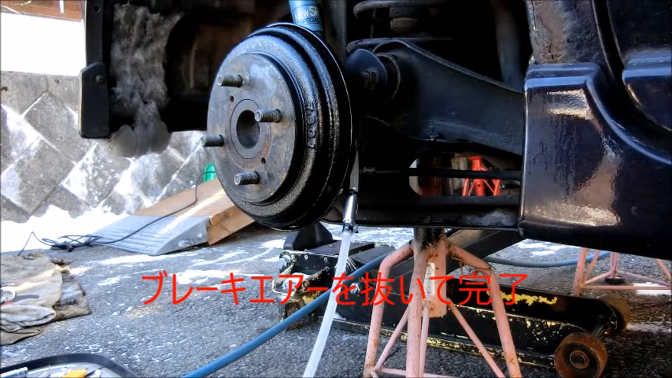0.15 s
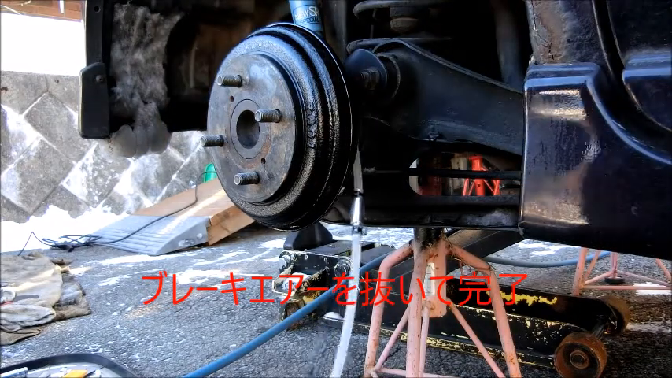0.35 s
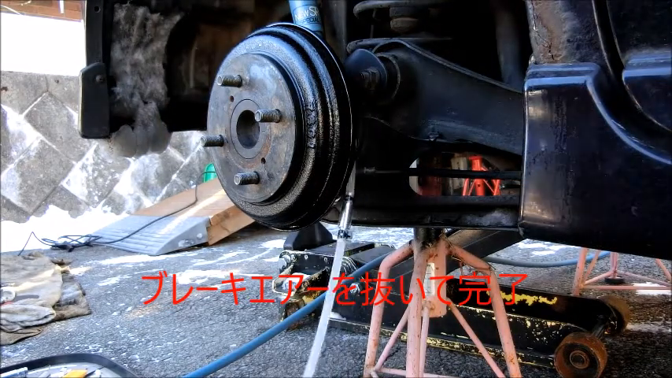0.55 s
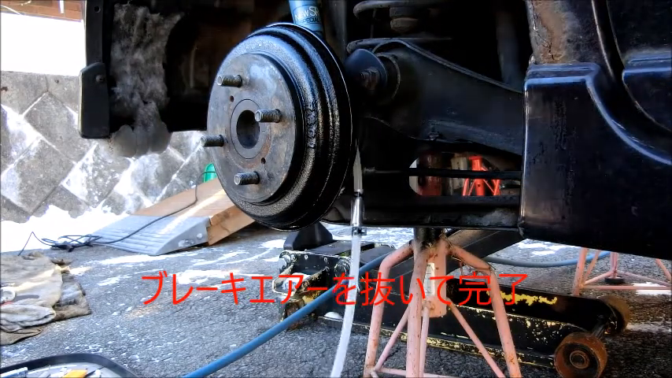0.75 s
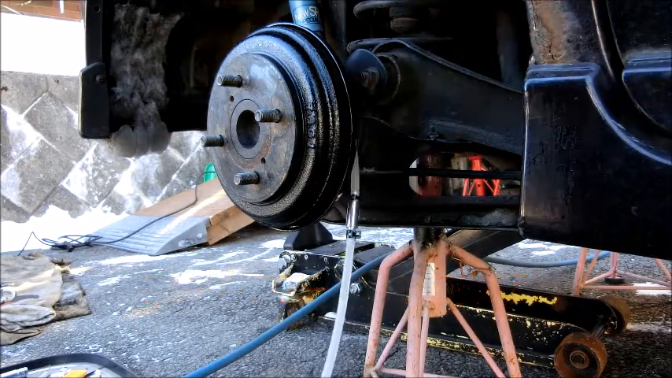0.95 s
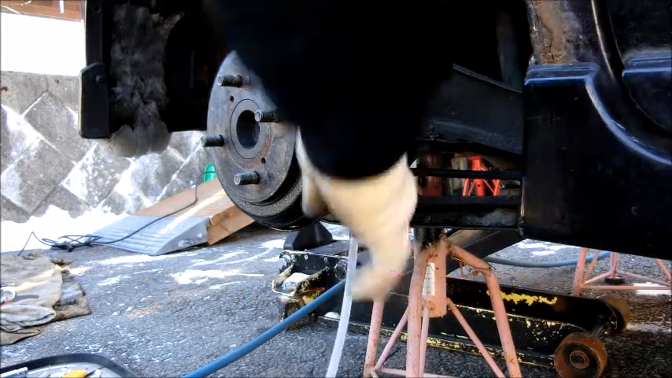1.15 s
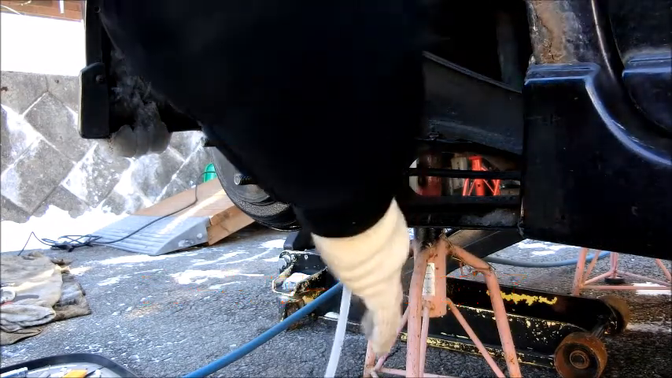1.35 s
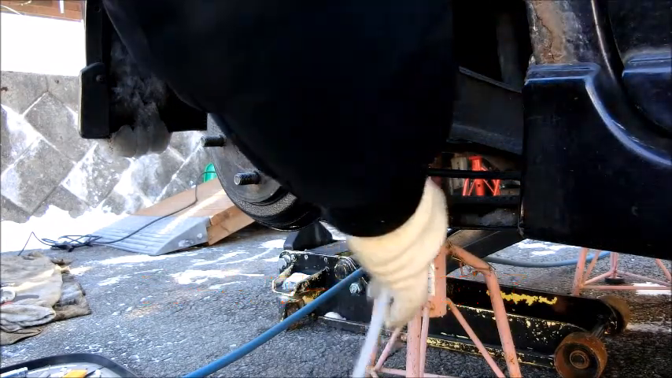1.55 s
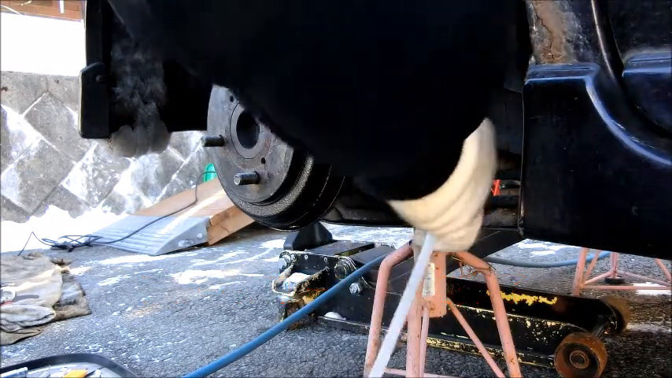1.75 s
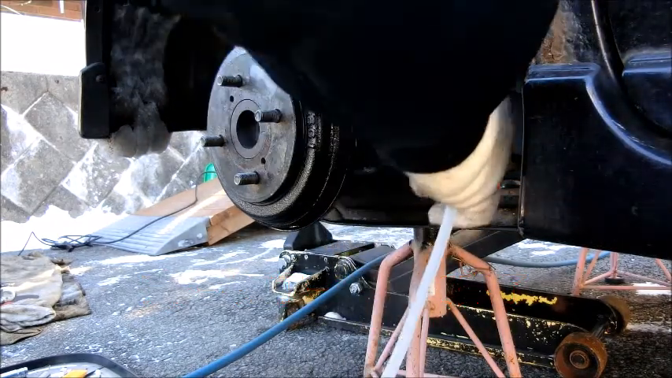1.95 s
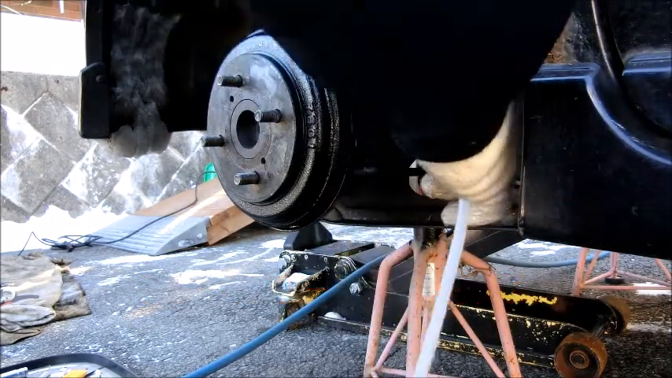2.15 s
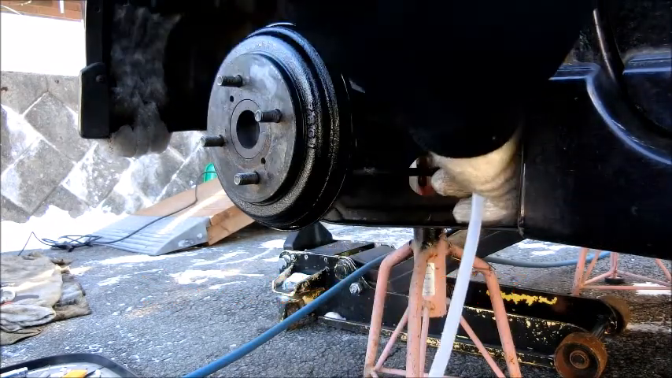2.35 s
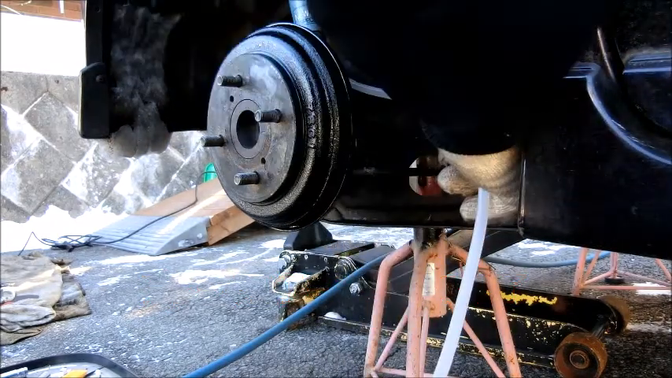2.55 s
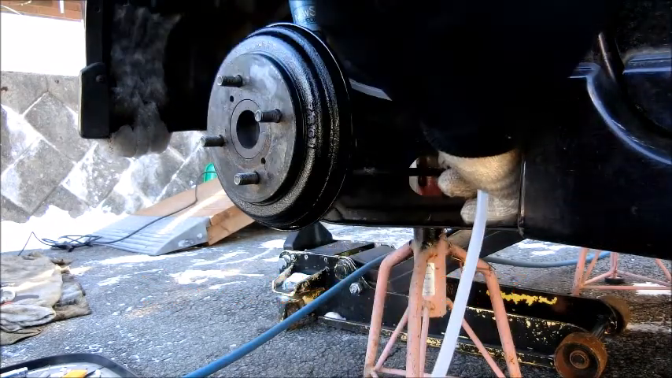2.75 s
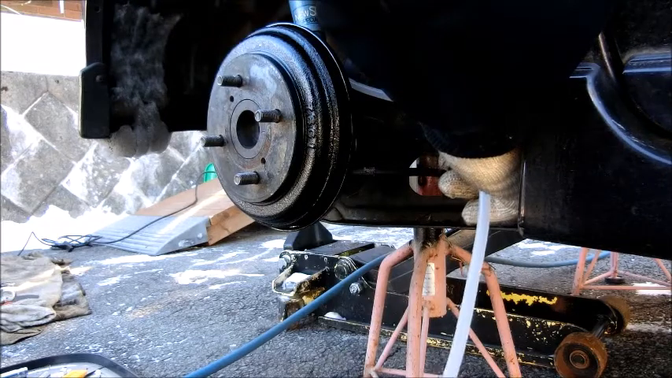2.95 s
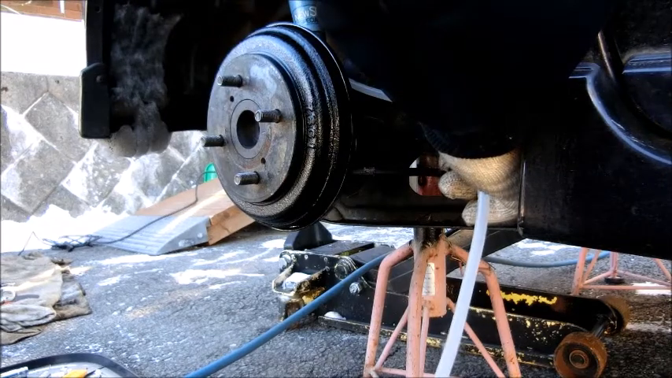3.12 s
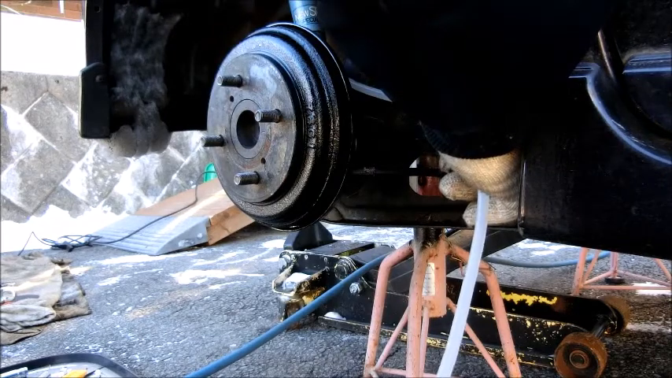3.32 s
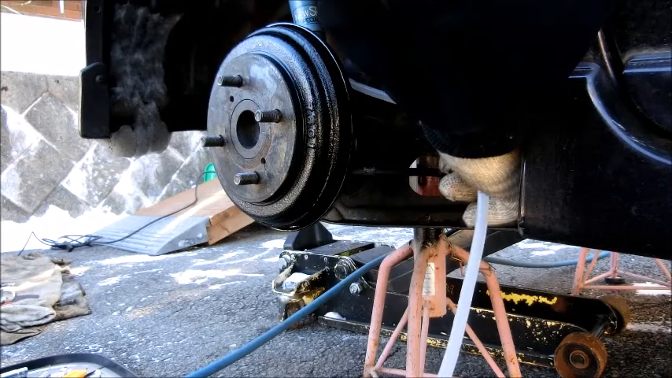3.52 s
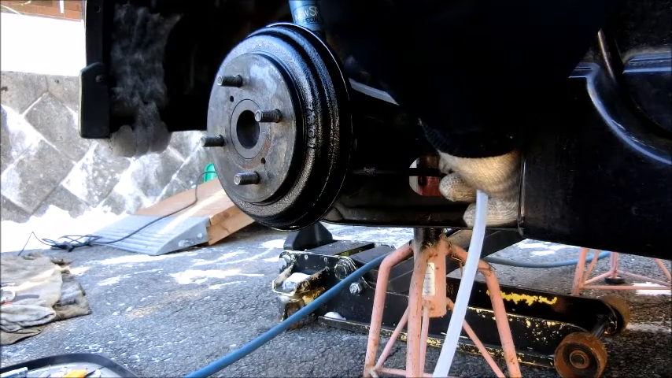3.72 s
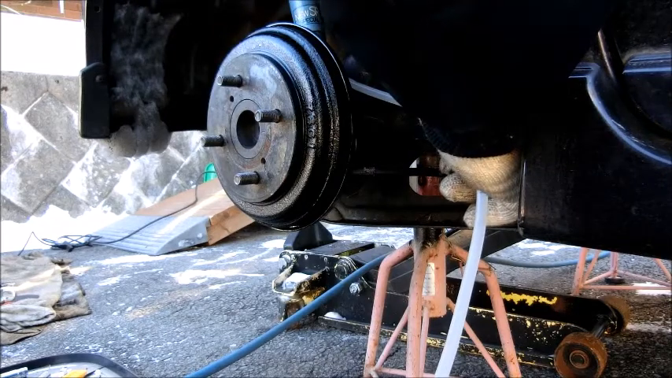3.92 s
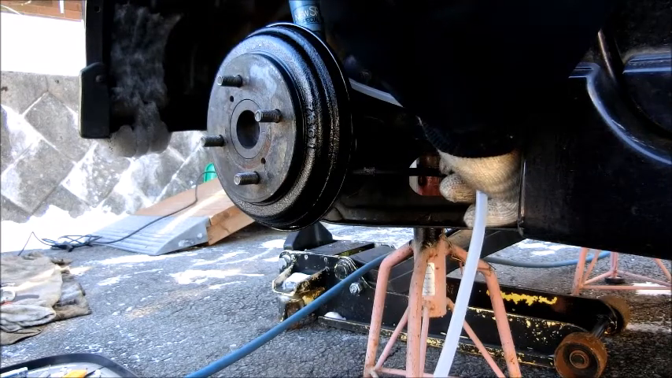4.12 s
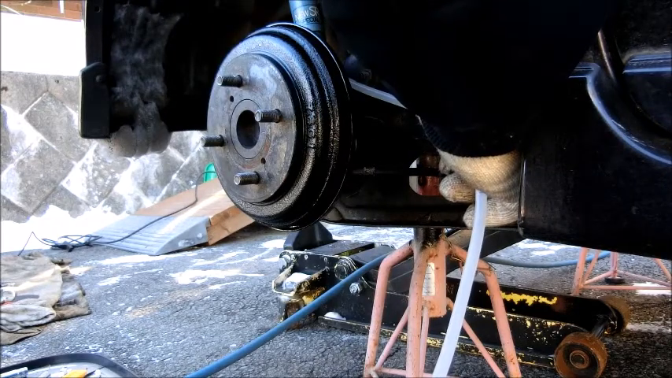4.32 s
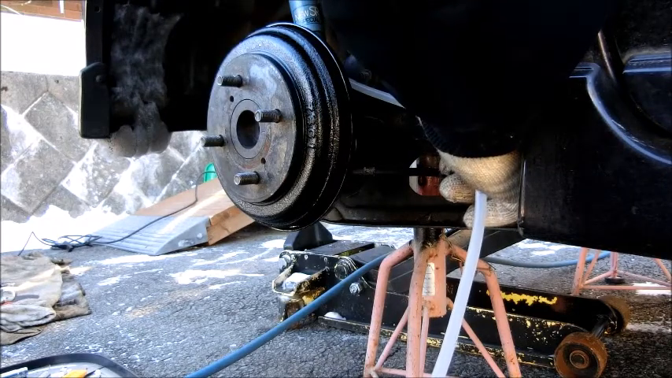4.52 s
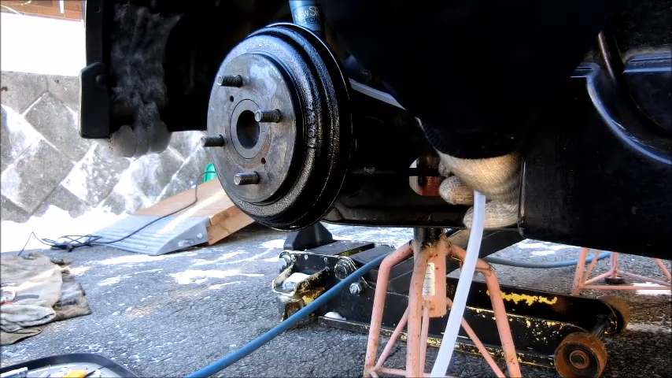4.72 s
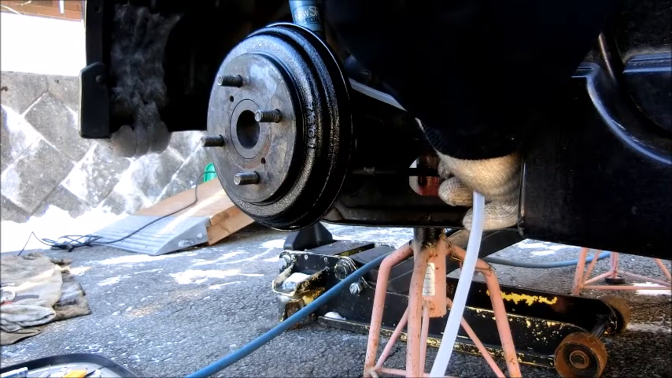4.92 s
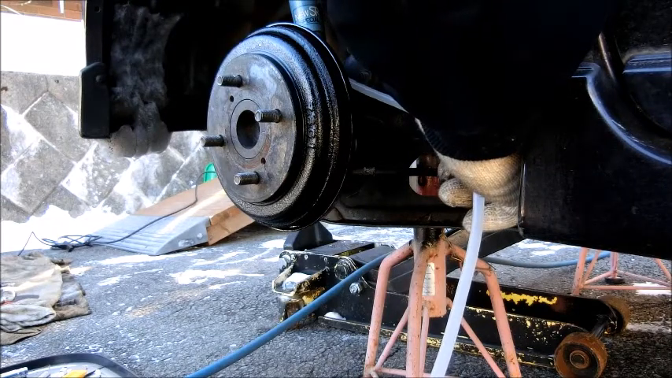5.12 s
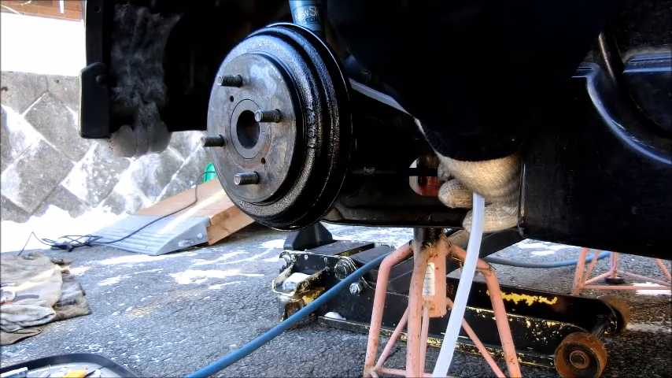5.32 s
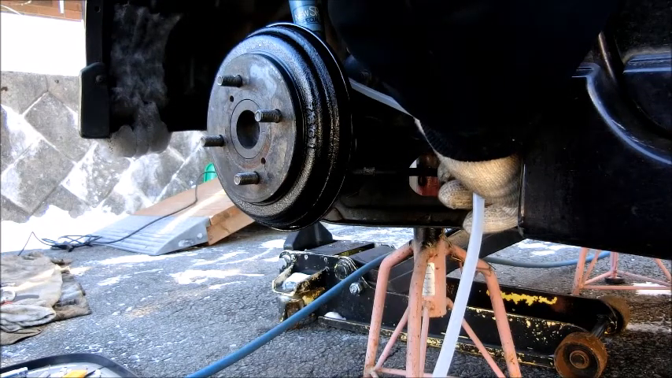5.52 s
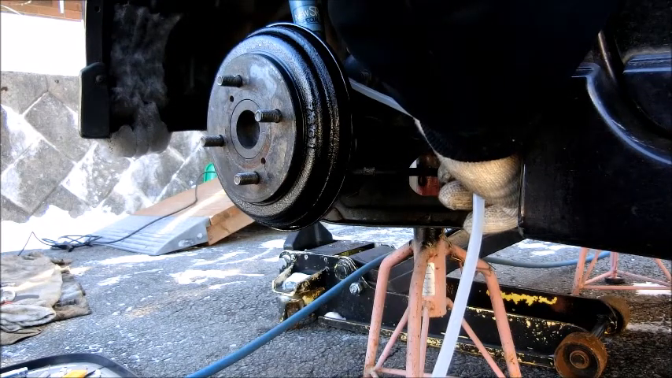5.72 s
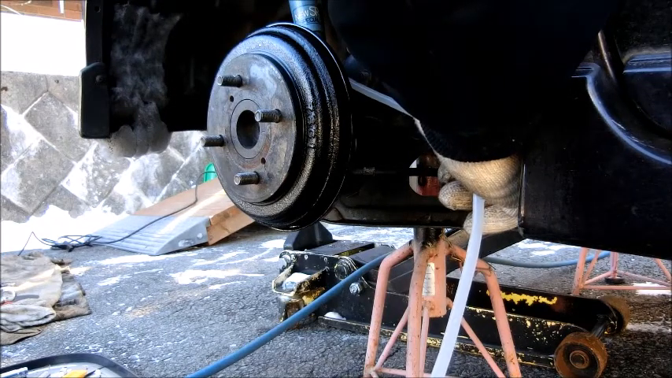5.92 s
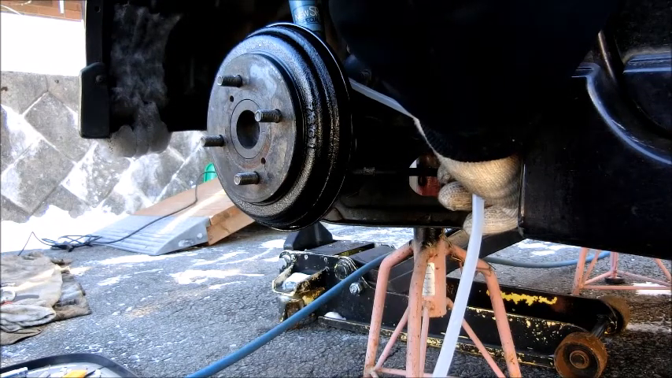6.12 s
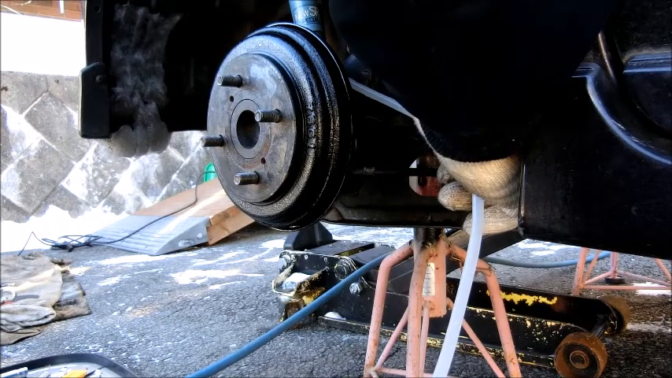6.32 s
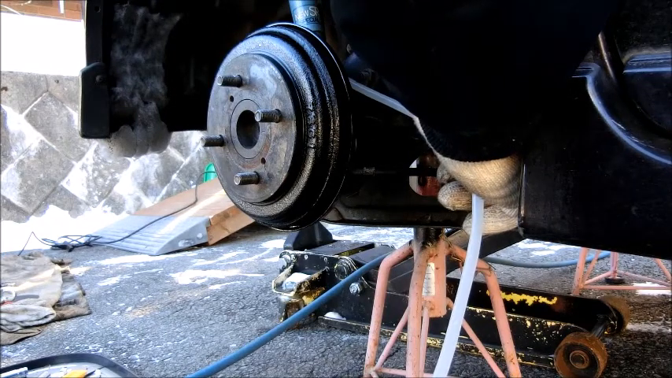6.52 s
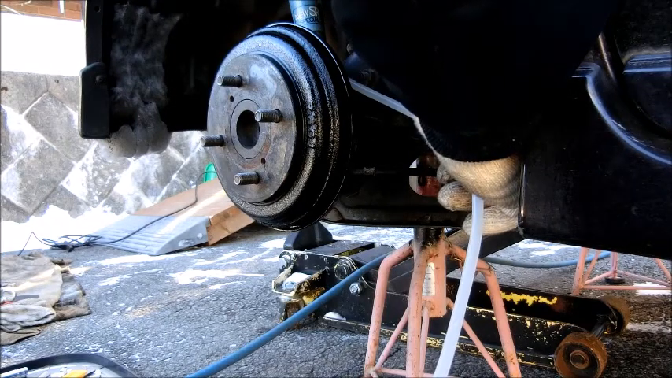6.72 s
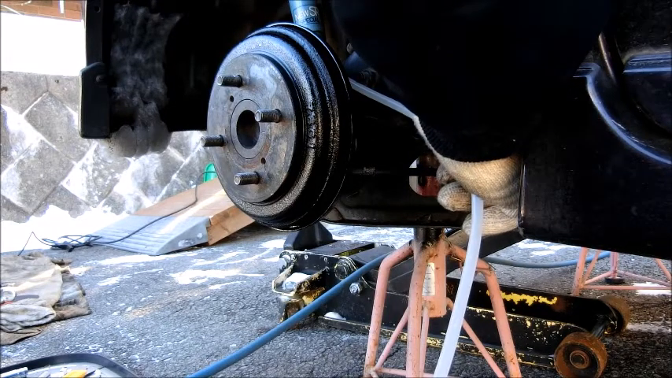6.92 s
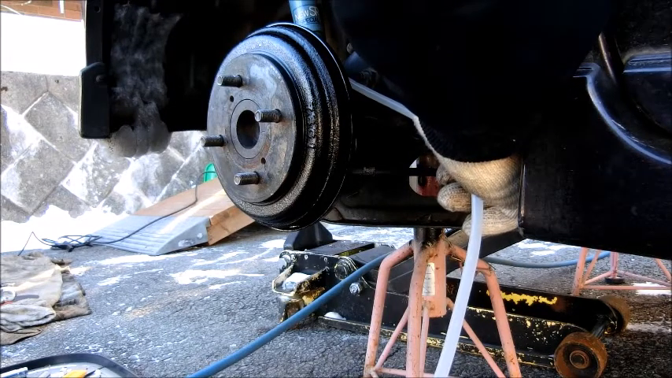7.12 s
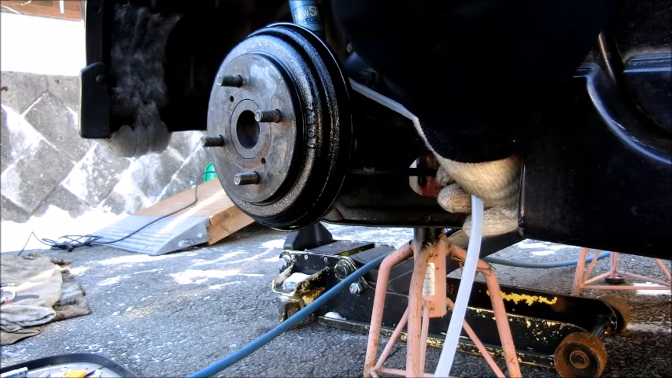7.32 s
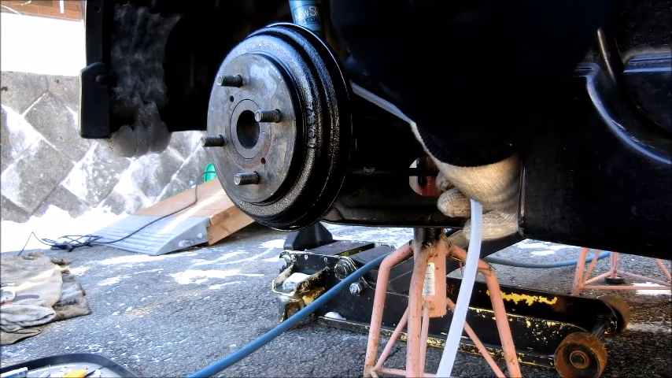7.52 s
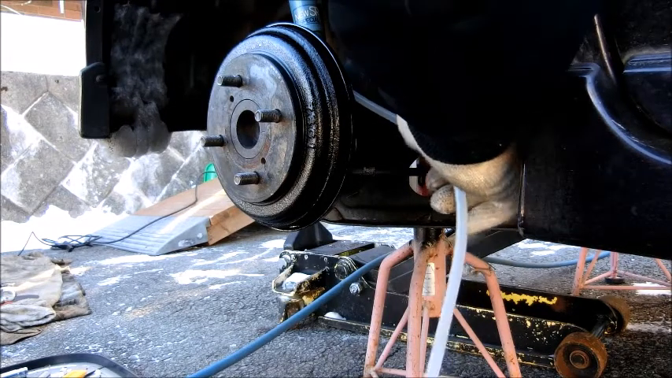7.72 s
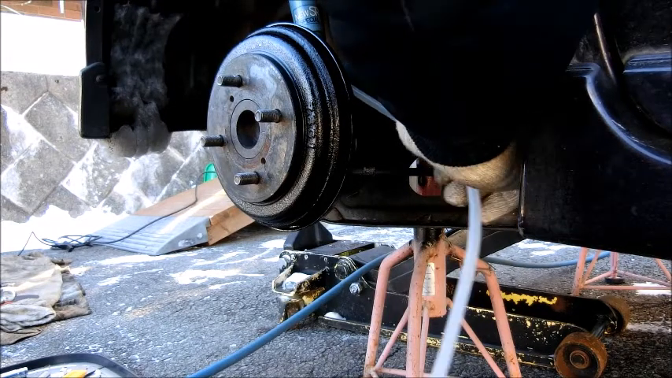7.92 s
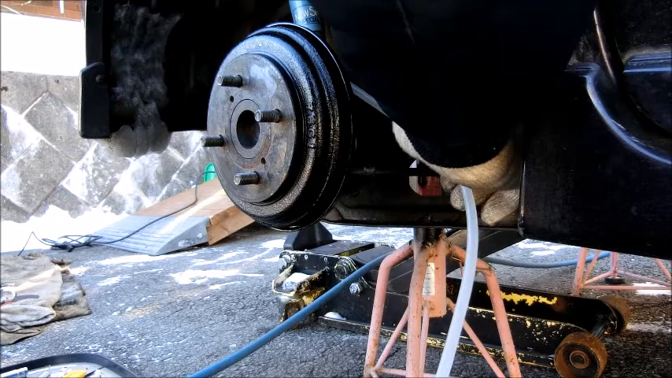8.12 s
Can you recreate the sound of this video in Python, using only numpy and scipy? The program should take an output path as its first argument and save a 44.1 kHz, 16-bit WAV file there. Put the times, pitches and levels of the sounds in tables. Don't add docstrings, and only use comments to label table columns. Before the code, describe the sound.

Over a faint air leak, metal clatters and cloth rubs close by; after low wind puffs, a bright jet of air bursts out and keeps hissing.

```python
import sys
import numpy as np
from scipy import signal
from scipy.fft import rfft, irfft, next_fast_len
from scipy.io import wavfile
from scipy.ndimage import uniform_filter1d

SR = 44100
rng = np.random.default_rng(int(sys.argv[2]) if len(sys.argv) > 2 else 0)


def store_pcm(level_fs):
    pcm = np.round(np.clip(level_fs, -1, 1) * 32767).astype(np.int16)
    wavfile.write(sys.argv[1], SR, np.atleast_2d(pcm).T)


def makeup_ratio(level_db):
    decades = np.asarray(level_db, float) / 20
    return 10 ** decades


N = 359856

# f/Hz, likeness/0-1
NEAR_ALIKE = [(60, 0.62), (300, 0.95), (1400, 0.76), (3100, 0.39), (7000, 0.087), (15000, 0.12)]


def unit(x):
    return x / np.sqrt(np.mean(x ** 2) + 1e-20)


def along(points, hz):
    f, v = np.transpose(points)
    return np.interp(np.log(hz + 1), np.log(f + 1), v)


def curves(rows):
    s, *cols = np.transpose(rows)
    return [np.interp(np.arange(N) / SR, s, c) for c in cols]


def wobble(rate_hz):
    knots = rng.standard_normal(int(N * rate_hz / SR) + 2)
    return np.interp(np.arange(N) * rate_hz / SR, np.arange(len(knots)), knots)


def smooth(shape):
    grid_s = np.arange(0, N / SR + .01, .001)
    return np.interp(np.arange(N) / SR, grid_s, shape(grid_s))


def stroke(t, rise_s, fall_s):
    return makeup_ratio(-10 * np.where(t < 0, -t / rise_s, t / fall_s))


def add(track, s, sound):
    start = round(s * SR)
    track[..., start:start + sound.shape[-1]] += sound


def filtered(x, response):
    m = next_fast_len(N + 8192)
    return irfft(rfft(x, m) * response(np.fft.rfftfreq(m, 1 / SR)), m)[..., :N]


def bumps(hz, rows, column=2):
    return sum(r[column] * np.exp(-((hz - r[0]) / r[1]) ** 2) for r in rows)


def rush(spectrum, alike, patchy_db, aside=0, rough_db=0):
    # f/Hz, lead/rad
    port_lead = [(500, .1), (1400, .3), (4800, 1.5), (7000, 2.7), (8300, 3.1), (9600, 3.9), (11000, 4.8),
                 (13000, 5), (15500, 5.4)]
    z = signal.stft(rng.standard_normal((2, N)), nperseg=512)[2]
    field = uniform_filter1d(rng.standard_normal(z.shape[1:]), size=8, axis=0)
    field = uniform_filter1d(field, size=10, axis=1)
    pair = signal.istft(z * makeup_ratio(patchy_db * unit(field)), nperseg=512)[1][:, :N]
    pair = pair * makeup_ratio(rough_db * wobble(700))
    m = next_fast_len(N)
    hz = np.fft.rfftfreq(m, 1 / SR)
    turn = np.arccos(np.clip(along(alike, hz), -1, 1)) / 2
    mid, side = rfft(pair, m) * makeup_ratio(along(spectrum, hz)) * [np.cos(turn), np.sin(turn)]
    lead = np.exp(.5j * aside * along(port_lead, hz))
    return unit(irfft([(mid + side) * lead, (mid - side) / lead], m)[:, :N])


def jet():
    # f/Hz, level/dB
    jet_tone = [(1500, -40), (3000, -20), (5000, -11), (6500, -9), (8000, -3), (10000, -1), (15300, -1),
                (17000, -4)]
    # f/Hz, likeness/0-1
    jet_alike = [(2000, 0.53), (3500, 0.26), (5000, 0.69), (6700, 0.27), (8000, 0.8), (9400, 0.65),
                 (10300, 0.4), (11000, 1), (13500, 0.63), (15000, 0.55)]
    # delay/s, level/dB
    echoes = [(.0031, -18), (.0054, -20), (.0092, -20), (.0137, -22)]
    # t/s, grip/0-2
    grip_path = [
        (2.68, 0),
        (2.85, 1),
        (4.3, 1.1),
        (4.5, 1.25),
        (4.56, 1.55),
        (5.2, 1.85),
        (5.7, 2),
        (7.78, 2),
        (7.87, 1.5),
    ]
    body_db, body_surge_db, cupped_db = -16.5, 4.5, 2.5
    split_hz = 6700

    def steady(x):
        return x / np.sqrt(np.abs(uniform_filter1d(np.mean(x ** 2, axis=0), size=SR // 4)))

    hiss_db, surge = flow()
    grip, = curves(grip_path)
    low_db = hiss_db + body_db + body_surge_db * surge + cupped_db * np.clip(grip - 1, 0, 1) ** 6.1

    air = rush(jet_tone, jet_alike, patchy_db=0.67, rough_db=0.5)
    air = air + sum(makeup_ratio(db) * np.roll(air, round(s * SR), axis=1) for s, db in echoes)
    air = sum(np.clip(1 - abs(grip - k), 0, 1) * filtered(air, arch(k)) for k in range(3))
    low = filtered(air, lambda hz: 1 / (1 + (hz / split_hz) ** 12))

    pan_db = np.interp(grip, [0, 1, 2], [.35, 1.1, .7]) * np.array([[1], [-1]])
    flutter_db = 0.3 * wobble(5.5) + 0.25 * wobble(17)
    hiss = makeup_ratio(hiss_db + 4.5 + pan_db) * steady(air - low)
    body = makeup_ratio(low_db + 3.5 + pan_db / 2) * steady(low)
    return makeup_ratio(flutter_db) * (hiss + body)


def flow():
    # t/s, level/dB
    slips = [
        (4.5, -1.2),
        (7.82, -1.5),
    ]
    open_s, opening_db_per_s = 2.584, 705
    settled_db = -21
    surge_db, surge_s = 1, 0.053
    sag_db, sag_s = 3, 0.44
    slip_s, regrip_s = .035, 0.84
    t = np.arange(N) / SR
    after = np.maximum(t - open_s, 0)
    surge = np.exp(-after / surge_s)
    db = settled_db + surge_db * surge + sag_db * np.exp(-after / sag_s)
    db = db + opening_db_per_s * np.minimum(t - open_s, 0)
    for s, slip_db in slips:
        db = db + slip_db * np.clip((t - s) / slip_s, 0, 1) * np.exp(-np.maximum(t - s, 0) / regrip_s)
    return db, surge


def arch(grip):
    # f/Hz, width/Hz, level/dB at opening, first grip, later grip
    arch_left = [(4750, 590, 1.0, 0.0, 3.5), (6340, 700, -0.5, -3.5, -2.0), (7150, 270, 0.5, -0.5, 3.5),
                 (8750, 700, 5.0, 2.5, 1.5), (8950, 220, -3.5, -4.5, -3.0), (9840, 120, -0.5, 3.0, 4.0),
                 (10420, 280, 2.0, -6.0, -4.0), (10800, 380, -5.0, 3.5, 5.5), (11570, 700, 7.5, 6.5, 1.5),
                 (11730, 150, -7.5, -8.0, -6.0), (12450, 700, 0.0, -1.5, 2.0),
                 (13440, 700, -3.0, -2.0, 2.5), (14160, 320, 3.5, 5.5, -0.5),
                 (15150, 700, -2.5, -1.5, -3.0)]
    arch_right = [(4950, 510, 1.0, 1.0, 5.5), (6080, 220, 4.0, 4.0, 2.0), (7000, 330, 5.0, 0.0, -0.5),
                  (7750, 160, -2.5, -2.5, 1.5), (8540, 700, 1.5, -0.5, 2.5), (9310, 360, -1.0, 3.0, 5.0),
                  (10100, 200, -4.0, -2.5, 3.5), (10870, 660, 4.5, 6.0, -1.0),
                  (11300, 150, 2.0, -3.0, -2.5), (11680, 290, -1.0, -2.0, 2.5), (12260, 420, 5.5, 1.5, 1.5),
                  (13120, 330, -1.0, 1.5, 2.0), (14040, 230, -2.0, 0.5, 2.5), (14420, 180, -2.0, 0.5, -3.0),
                  (14880, 340, -4.0, 0.5, 1.0)]
    valve = [(2130, 440, 13.6, 11, 11.5)]
    # f/Hz, lead/rad at opening, first grip, later grip
    jet_lead = [(500, .1, .1, .1), (2400, .5, .5, .7), (4800, 1.6, 1.5, 1.6), (5900, 1.2, 1.4, 3),
                (6600, 2.5, 2.6, 3), (7250, 4.5, 3.8, 2.3), (8300, 3.8, 3.2, 3), (9900, 3.5, 3.5, 4),
                (10700, 4.8, 5.1, 4.8), (12000, 4.2, 4.2, 4.8), (13100, 5.1, 4.7, 5.3),
                (14100, 5.4, 5.4, 4.9), (15500, 5.7, 5.6, 5.7)]
    lead = [(row[0], row[1 + grip]) for row in jet_lead]

    def response(hz):
        colour_db = np.array([bumps(hz, side + valve, 2 + grip) for side in (arch_left, arch_right)])
        return makeup_ratio(colour_db) * np.exp(.5j * along(lead, hz) * np.array([[1], [-1]]))

    return response


def glove():
    # f/Hz, level/dB
    cloth = [(1470, -26), (2500, -6), (3430, -2.5), (3640, -4), (4730, -5.5), (7920, -1.5), (10600, 0),
             (13200, -1.5), (14900, -2), (15700, -16)]
    # f/Hz, level/dB
    rub_tone = [(180, -42), (300, -2), (380, -2.5), (929, 1), (1010, 2.5), (2380, -1.5), (3730, -30),
                (5000, -30), (6500, -38), (11000, -120)]
    # peak t/s, rustle level/dB, rub re rustle/dB, rise/s, fall/s
    strokes = [
        (.054, -53, -4, .3, 0.13),
        (.46, -57, 0.5, .3, .04),
        (.59, -52, 1, 0.087, 0.15),
        (.79, -53, -2, .1, .1),
        (.98, -43.5, -6.5, 0.24, 0.14),
        (1.19, -46, -3.5, 0.9, 0.13),
        (1.64, -52.5, -10, 0.095, 0.15),
        (1.74, -58, -2, .08, .05),
        (2.12, -61, -13, .05, .05),
    ]

    def moves(dull):
        def loudest(t):
            return np.max([makeup_ratio(db + dull * rub_db) * stroke(t - s, rise_s, fall_s)
                           for s, db, rub_db, rise_s, fall_s in strokes], axis=0)
        return smooth(loudest)

    rustle = makeup_ratio(7.0) * moves(0) * rush(cloth, NEAR_ALIKE, patchy_db=1.3, aside=0.66, rough_db=1.0)
    rub = makeup_ratio(4.0) * moves(1) * rush(rub_tone, NEAR_ALIKE, patchy_db=0.5, aside=0.52, rough_db=-3.0)
    return rustle + rub


def tool():
    # t/s, peak/dB, treble/dB, rattle/s
    drops = [
        (0.316, -16.5, -22, 0.055),
        (0.378, -24.5, -1, 0.049),
        (0.417, -39, 3, 0.035),
        (0.421, -28.5, -3, 0.04),
        (0.574, -38.5, -2, 0.041),
    ]
    # f/Hz, level/dB, t60/s
    tool_modes = [(616, -17, 0.093), (1130, -10, 0.17), (2000, -16, 0.081), (2190, -6.5, 0.1),
                  (2620, 0.5, 0.036), (3850, -4, 0.046), (5250, -9, 0.036)]
    out, t = np.zeros(N + SR), np.arange(SR // 5) / SR
    for s, db, treble_db, rattle_s in drops:
        ring = sum(makeup_ratio(mode_db + rng.normal(0, 1.4) - 60 * t / t60) * np.sin(2 * np.pi * hz * t)
                   for hz, mode_db, t60 in tool_modes)
        scuff = rng.standard_normal(len(t)) * np.exp(-(t / (0.24 * rattle_s)) ** 2)
        bright = makeup_ratio(treble_db + 11) * np.gradient(scuff)
        add(out, s, makeup_ratio(db - 10) * (ring + 0.87 * scuff + bright))
    return out[:N]


def ticks():
    # t/s, peak/dB, f/Hz, t60/s
    tick_list = [(.024, -45, 805, .012), (.72, -35, 1500, 0.011), (0.754, -32, 660, .012),
                 (.78, -32, 3080, 0.011), (.781, -34, 1800, .015), (.792, -27, 1100, 0.0085),
                 (.847, -26, 1300, 0.014), (0.849, -34, 500, 0.013), (0.861, -37, 600, .01),
                 (.947, -36, 1660, 0.086), (.965, -37, 2110, .04), (1.125, -23.5, 900, 0.0064),
                 (1.18, -37, 900, 0.017), (2.1, -46, 797, 0.054), (2.539, -42, 1210, 0.0099)]
    out, t = np.zeros(N + SR), np.arange(SR // 5) / SR
    for s, db, hz, t60 in tick_list:
        grit = uniform_filter1d(rng.standard_normal(len(t)), size=6)
        add(out, s, makeup_ratio(db - 1 - 60 * t / t60) * (np.sin(2 * np.pi * hz * t) + 0.91 * grit))
    return out[:N]


def knocks():
    tail_t60_s, wet_db = 0.064, -7
    direct = tool() + ticks()
    tail = rng.standard_normal((2, SR // 6)) * makeup_ratio(-60 * np.arange(SR // 6) / SR / tail_t60_s)
    wet = signal.fftconvolve(direct[None], tail / np.linalg.norm(tail[0]), axes=1)[:, :N]
    return np.array([direct, np.roll(direct, 2)]) + makeup_ratio(wet_db) * wet


def wind():
    # t/s, peak/dB, f/Hz
    puffs = [(1.19, -37, 46), (1.225, -30, 92), (1.3, -45, 60), (1.375, -38, 80), (1.479, -40, 136),
             (1.601, -30, 90), (1.618, -28, 213), (1.627, -35, 139), (1.645, -42, 90), (1.7, -22, 166),
             (1.712, -27, 300), (1.73, -34, 80), (1.748, -36, 120), (1.765, -36, 110), (1.781, -21.5, 183),
             (1.803, -32, 145), (1.83, -37, 110), (2.082, -48, 60)]
    # t/s, level/dB, half length/s
    gusts = [
        (1.24, -48, 0.091),
        (1.702, -48, .15),
        (2.25, -66, 0.22),
    ]
    puff_cycles, lee_db, lee_follows = 0.66, -59, .35
    calm_db = -61.5
    out, t = np.zeros((2, N)), np.arange(-SR // 20, SR // 20) / SR
    for s, db, hz in puffs:
        puff = np.cos(2 * np.pi * hz * t - .5) * np.exp(-(t * hz / puff_cycles) ** 2)
        left_db = lee_db + lee_follows * (db - lee_db - 17)
        add(out, s + t[0], -makeup_ratio([[left_db], [db]]) * puff)

    def gust_gain(t):
        return makeup_ratio(calm_db) + sum(makeup_ratio(db) * stroke(t - s, half_s, half_s) for s, db, half_s in gusts)

    buffet = rush([(20, -6.5), (110, -2), (250, -11), (500, -32), (1000, -60)], [(100, 0.25)], patchy_db=3.5)
    port_db = np.array([[-2.5], [1.5]]) + 1.6 * wobble(14)
    return out + smooth(gust_gain) * makeup_ratio(port_db) * buffet


def tubes():
    # (t/s, length/s, level/dB)
    tube_swells = [
        (804, [(-.15, 0.35, -58.5), (.17, 0.29, -53.5), (.4, 0.28, -66), (1.3, .68, -69)]),
        (756, [(1.51, 0.17, -61)]),
        (990, [(.46, 0.74, -64), (1.87, .38, -67)]),
        (2137, [(.02, 0.17, -57), (.2, .09, -64), (.62, .12, -60.5), (.76, .24, -61), (1.44, 0.33, -62)]),
    ]
    out = np.zeros(N)
    for hz, swells in tube_swells:
        def swelling(t):
            return sum(makeup_ratio(db + 6.5) * abs(np.sin(np.pi * np.clip((t - s) / length_s, 0, 1))) ** 0.65
                       for s, length_s, db in swells)
        gain = smooth(swelling) * makeup_ratio(1.2 * wobble(18.3))
        out += gain * np.sin(2 * np.pi * hz * np.arange(N) / SR + .6 * wobble(30.1))
    return out


def yard():
    # f/Hz, level/dB
    yard_tone = [(25, -7.5), (120, -1.5), (250, -5.5), (500, -10), (1000, -11.5), (1600, -16),
                 (3000, -19.5), (4500, -44)]
    # f/Hz, level/dB
    leak_tone = [(1500, -30), (3300, -11), (3470, -1.5), (3700, -5), (4700, -5.5), (5100, -10), (6700, -12),
                 (8700, -9.5), (9600, -5), (10000, -1), (10900, -2), (11600, -10), (15300, -13.5),
                 (17000, -16)]
    # f/Hz, width/Hz, level/dB
    settled_colour = [(9900, 350, 3), (10250, 80, -4), (11000, 400, -4)]
    # t/s, share/0-1
    settle = [(1.3, 0), (2.4, 1)]
    leak_db, yard_db = -48.5, -55
    leak = rush(leak_tone, NEAR_ALIKE, patchy_db=1.2, aside=0.99)
    share, = curves(settle)
    leak = (1 - share) * leak + share * filtered(leak, lambda hz: makeup_ratio(bumps(hz, settled_colour)))
    leak = makeup_ratio(leak_db + 0.67 * wobble(2.95)) * leak
    return leak + makeup_ratio(yard_db) * rush(yard_tone, NEAR_ALIKE, patchy_db=1.5)


def scene():
    return jet() + glove() + knocks() + wind() + tubes() + yard()


def roll_off(x):
    return signal.sosfilt(signal.butter(12, 15770, fs=SR, output="sos"), x)


def record(dry):
    # f/Hz, level/dB
    grit_tone = [(25, -0.5), (200, 0), (1200, 2.5), (2100, 2), (3000, -0.7), (6000, -4.5), (16000, -6)]
    # f/Hz, width/Hz, level/dB
    notches = [(11720, 45, -6), (15470, 90, -12), (15700, 160, -7)]
    grit_db, top_hz = -17 + 0.5 * np.array([[-1], [1]]), 15770
    envelope = np.sqrt(np.abs(uniform_filter1d(dry ** 2, size=40, axis=1)))
    noise = rush(grit_tone, [(100, 0), (500, 0.0), (1800, 0.16), (3000, 0.058)], patchy_db=0.58)
    gritty = dry + makeup_ratio(grit_db) * envelope * noise
    mix = filtered(gritty, lambda hz: makeup_ratio(bumps(hz, notches)) * (hz < top_hz))
    return roll_off(mix)


dry = scene()
out = record(dry)
store_pcm(out)
```